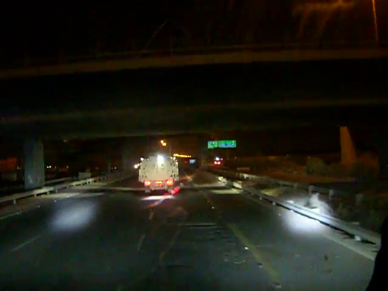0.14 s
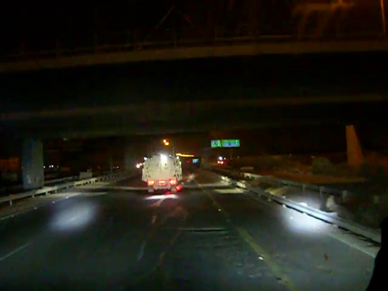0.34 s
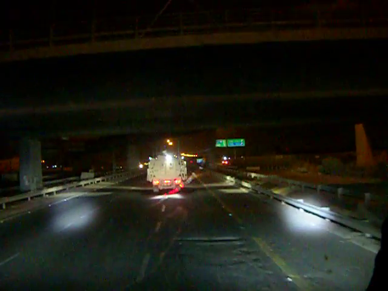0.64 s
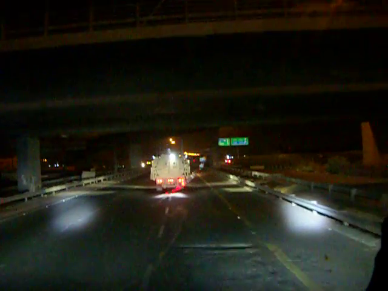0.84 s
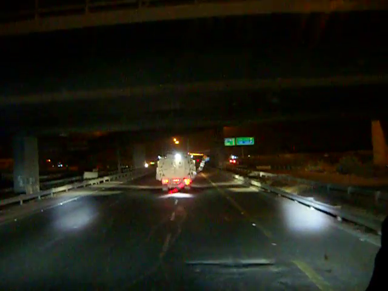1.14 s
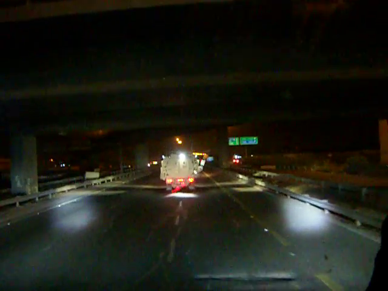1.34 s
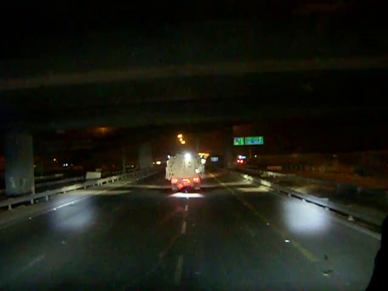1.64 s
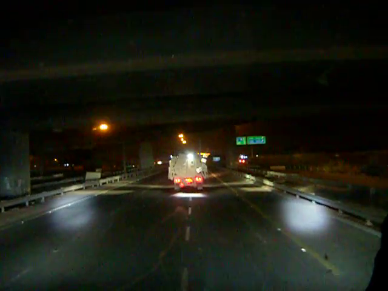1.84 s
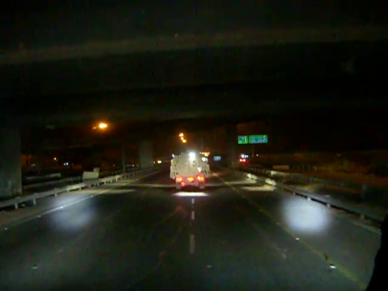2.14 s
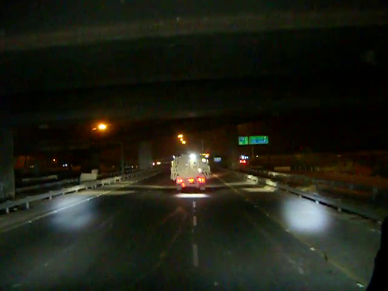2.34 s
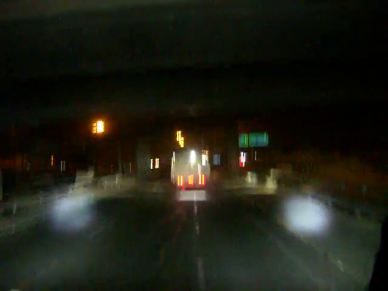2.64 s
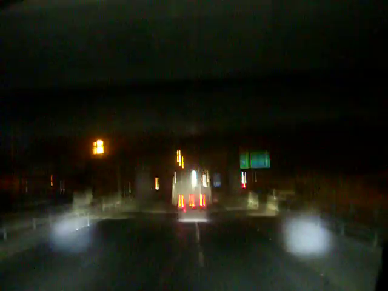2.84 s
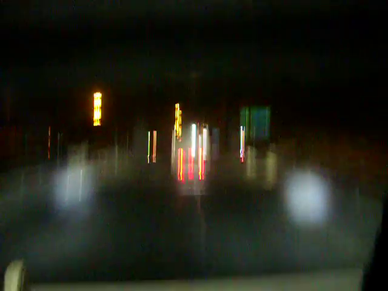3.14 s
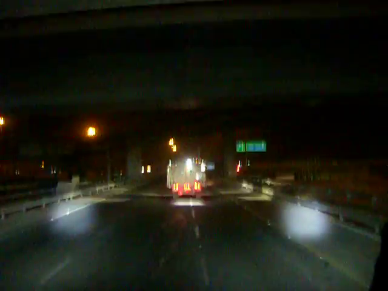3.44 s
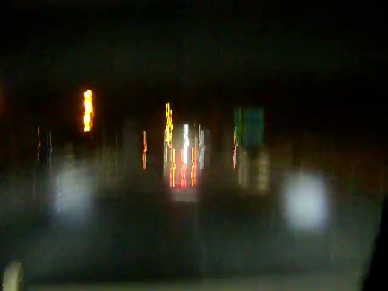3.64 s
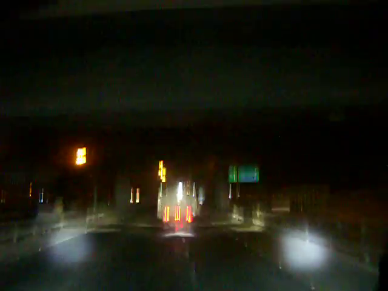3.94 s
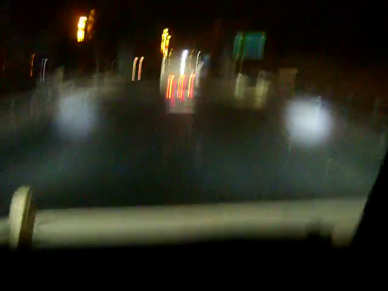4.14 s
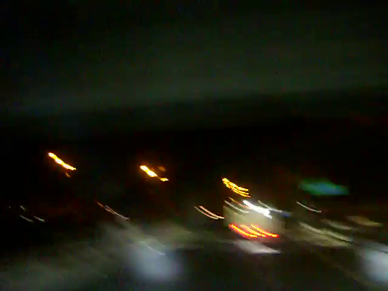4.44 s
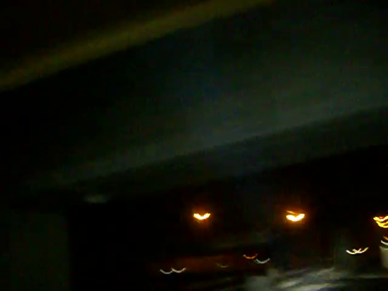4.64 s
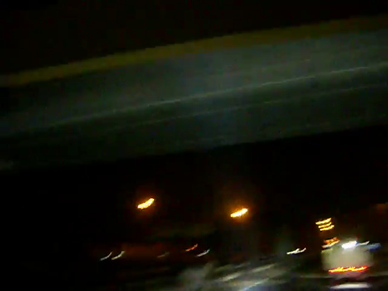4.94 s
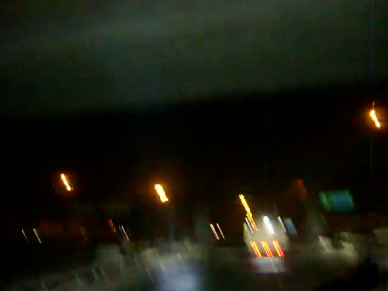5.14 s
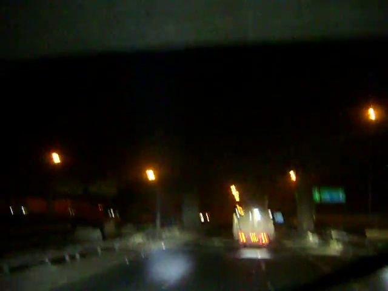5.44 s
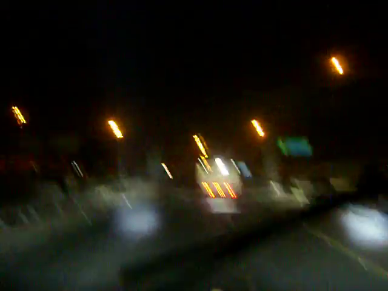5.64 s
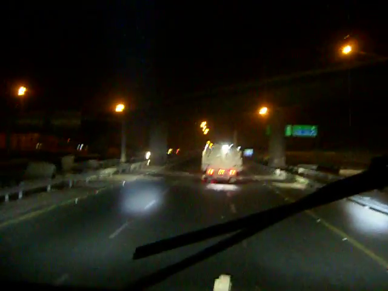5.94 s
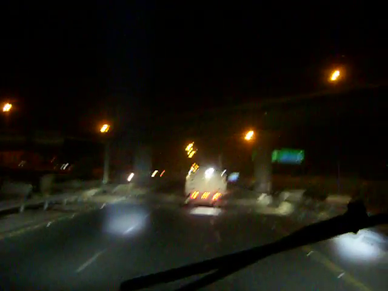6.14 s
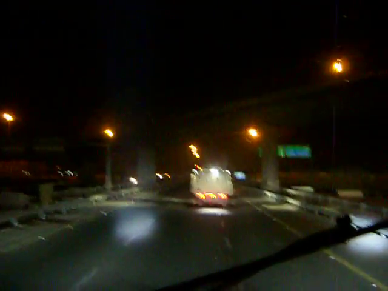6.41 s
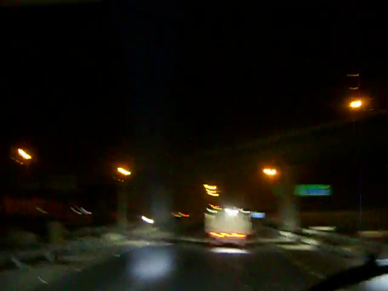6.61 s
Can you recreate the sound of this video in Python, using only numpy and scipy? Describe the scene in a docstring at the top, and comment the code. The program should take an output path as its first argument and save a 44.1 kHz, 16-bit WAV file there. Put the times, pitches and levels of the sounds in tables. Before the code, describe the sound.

Inside a heavy truck cab driving at night, a small hand-held camera hears a continuous low engine drone, wavering sub-bass boom, muffled road roar and light hiss, with faint steady whines. At first the engine pulls; from about 0.5 to 1.3 seconds its pitch drops and it coasts, slightly quieter. Tiny trim squeaks appear around 0.9 to 1.9 and again from 2.4. From about 2.7 to 4.3 seconds the road turns rough: a loose panel bangs in fast, irregular, hollow metallic blows, around sixteen a second, with clattering gear and sharp squeaks, loud enough to clip harshly. A hard tap on the camera comes at 4.3, another at 4.9, a very faint one at 6.1. From about 4.4 the engine picks up slightly, and as the camera turns the tone colour shifts, somewhat duller. Steady booming drone continues to the end, near 6.8 seconds.

```python
"""Inside the cab of a heavy truck, beside a small hand-held camera, the cab booms over the engine and road drone.
The boom is a wavering sine with low noise; engine tones are multiples of one cycle, and the drone is coloured noise.
Over a rough stretch a loose panel bangs irregularly, some sixteen times a second, and overloads the microphone.
Trim squeaks as noise through narrow resonances, loose gear clatters, and taps on the camera body ring briefly.
The engine slows, coasts and picks up again; as the camera turns, other engine tones come forward."""
import sys
import numpy as np
from scipy import signal
from scipy.fft import rfft, irfft, next_fast_len
from scipy.io import wavfile
from scipy.ndimage import uniform_filter1d, map_coordinates

SR = 44100
rng = np.random.default_rng(int(sys.argv[2]) if len(sys.argv) > 2 else 0)


def output_pcm(signal):
    """Save a mono or channel-first signal as 16-bit PCM at the path in sys.argv[1].

    Samples are clipped to [-1, 1] before scaling.
    """
    pcm = np.clip(np.atleast_2d(signal).T, -1, 1) * 32767
    wavfile.write(sys.argv[1], SR, np.round(pcm).astype(np.int16))


N = 298622

# Throb of the cab air and springs. Each row: time in seconds, level in dB.
BOOM_LEVEL = [(0.0, -20), (0.11, -18), (0.47, -8.5), (0.68, -10.5), (0.94, -20.5), (1.26, -14.5),
              (1.9, -18.5), (2.11, -25.5), (2.37, -15), (2.85, -22), (3.41, -14), (3.64, -24), (3.75, -11),
              (4.22, -16), (4.54, -9), (4.66, -23), (4.71, -15.5), (5.02, -11), (5.6, -18.5), (5.81, -10.5),
              (6.19, -12), (6.47, -21), (6.66, -12.5), (6.77, -12)]
# Rocking on the mounts. Each row: frequency in Hz, relative density in dB.
SWAY_SPECTRUM = [(4, -31.5), (9, -8.5), (14, -3.5), (18, -3), (20.5, -5.5), (24, -37.5), (30, -140)]
# Engine cycle rate. Each row: time in seconds, cycles per second in Hz.
ENGINE_SPEED = [(0, 24.1), (.45, 24), (.94, 20.5), (1.3, 19.2), (4.35, 19.4), (4.8, 20.75), (5.5, 20.9),
                (6.77, 20.85)]
# Multiples of the engine cycle that stand out. Each entry: a whole number.
MULTIPLES = [3, 4, 5, 6, 7, 8, 9, 12, 15, 16, 23, 25, 26, 32, 34, 35, 37, 40, 49, 52]
# Their levels under load, coasting, and with the camera turned, before the cab mode's lift. Each entry: level in dB.
PULLING_DB = [-36, -31, -28, -32, -33.5, -33, -33, -35.5, -30.5, -29.5, -34.5, -47.5, -37.5, -46, -31, -40,
              -48, -36, -56, -47.5]
COASTING_DB = [-31.5, -30, -37.5, -28.5, -36.5, -36, -39, -47, -46.5, -46.5, -44, -48, -42, -42, -37.5,
               -49.5, -40, -50.5, -54, -56.5]
TURNED_DB = [-33.5, -32, -37.5, -30, -38.5, -43.5, -38.5, -44.5, -43.5, -34, -52, -41.5, -35, -42.5, -41,
             -39.5, -36, -39, -42, -42]
# Whines independent of the engine. Each row: start and end in seconds, frequency in Hz, start and end level in dB.
WHINES = [(-.2, 2.4, 549, -36, -34.5), (-.2, 2, 645, -38, -31.5), (-.2, 4.4, 1400, -43, -41),
          (4.1, 5.15, 1225, -43, -41.5), (4.9, 6.4, 1626, -47, -48.5), (5.1, 7, 608, -28, -26.5),
          (6.55, 7, 1400, -43, -44.5)]
# Panel bangs. Each row: start in seconds, level in dB before a common 2 dB cut, length of the ring in seconds,
# ring relative to chatter in dB.
BANGS = [(2.684, -31.5, 0.013, 20.5), (2.78, -4.5, 0.014, -17.5), (2.826, -1.5, 0.021, -1.5),
         (2.926, -3.5, .02, 6), (3.023, 5.5, 0.031, -6), (3.111, -7.5, .025, 7.5),
         (3.15, -13.5, 0.011, -15), (3.202, 2.5, 0.022, -3.5), (3.271, -9.5, .008, 5),
         (3.282, 0.5, 0.0078, 9.5), (3.343, -5, 0.023, 1.5), (3.421, -15, 0.011, 7), (3.448, -27, .008, 9),
         (3.478, -8.5, 0.0053, 7.5), (3.521, -12.5, 0.013, 4), (3.537, -13, 0.026, 0),
         (3.601, 0.5, .027, -8), (3.686, 3.5, 0.01, 5), (3.746, -13.5, .03, -4.5), (3.795, 2, .032, -9.5),
         (3.866, -1.5, .036, 3.5), (3.953, 2.5, .027, -1), (4.024, -13.5, 0.01, -3.5), (4.041, 2, .031, 0),
         (4.226, -12, 0.011, -5), (4.263, -20.5, 0.0094, 9.5), (4.297, -13.5, 0.027, -14.5)]
# Panel rattling on its frame. Each row: frequency in Hz, relative density in dB.
CHATTER_SPECTRUM = [(60, -42.5), (150, -5.5), (340, 0.5), (550, -3), (690, -6.5), (950, -5.5),
                    (1340, -13.5), (2150, -17), (3000, -18.5), (4200, -26.5), (6000, -120)]
# Upper panel modes. Each row: frequency in Hz, width in Hz, relative level in dB before each blow's scatter.
PANEL_MODES = [(950, 100, 10.5), (1270, 69, -13.5), (1590, 61, -6), (1970, 43, -8.5), (2150, 120, -10.5),
               (2800, 120, -19), (3330, 220, -18.5)]
# Strength of the rough stretch. Each row: time in seconds, level in dB before each source's own offset.
SHAKE_LEVEL = [(2.3, -29.5), (2.66, -18.5), (2.93, -11.5), (3.14, -10), (3.26, -20.5), (3.4, -17.5),
               (3.71, -13), (3.9, -11), (4.24, -23.5), (4.6, -28)]
# Rubbing trim. Each row: start in seconds, level in dB, frequency in Hz, length in seconds.
SQUEAKS = [(0.861, -26.5, 2250, 0.013), (1.006, -25.5, 2210, 0.032), (1.407, -34, 2300, 0.018),
           (1.53, -31, 2310, 0.015), (1.756, -25, 2170, 0.038), (1.874, -32, 1630, 0.035),
           (2.445, -28.5, 1570, 0.027), (2.578, -21, 1740, 0.027), (2.718, -27, 2300, 0.036),
           (2.799, -14.5, 1885, 0.0065), (3.014, -6, 2215, 0.011), (3.045, -18, 2095, 0.019),
           (3.145, -18, 1973, 0.034), (2.365, -21.5, 722, 0.039), (4.456, -29.5, 1630, 0.019),
           (4.551, -31, 2100, 0.021)]
# Taps on the camera body. Each row: start in seconds, level in dB.
TAPS = [(4.3183, 5.5), (4.885, 1), (6.118, -22)]
# Noise spectra: low rumble, roar with the camera facing ahead and turned, and hiss.
# Each row: frequency in Hz, relative density in dB.
RUMBLE_SPECTRUM = [(30, -42.5), (40, -9), (52, -5.5), (65, -3), (86, -3), (100, -6.5), (125, -4.5),
                   (160, -9.5), (210, -18.5), (290, -45.5), (500, -120)]
ROAR_AHEAD_SPECTRUM = [(100, -25), (170, -1), (322, -4.5), (366, -1.5), (405, -4.5), (555, 1), (594, -2.5),
                       (636, 0.5), (748, -4.5), (821, -1), (1030, -17.5), (1300, -17), (1690, -49.5),
                       (2860, -120)]
ROAR_TURNED_SPECTRUM = [(100, -26), (170, -12.5), (265, -6.5), (330, -6), (378, -7), (476, -9), (609, 0.5),
                        (675, -8), (754, -3), (894, -8), (1070, -12.5), (1300, -25), (1690, -64),
                        (2860, -120)]
HISS_SPECTRUM = [(590, -24.5), (1000, 2), (1150, -8), (1260, -3), (1330, -13), (1440, -7), (1470, -8.5),
                 (1790, -9.5), (2190, -6), (2600, -6), (2850, -7), (3620, -14.5), (4120, -18), (5360, -47),
                 (9060, -120)]

BOOM_HZ = 26.32
CAB_HZ, CAB_WIDTH_HZ, CAB_DB = 75.2, 5.4, 3.5  # cab mode, and its peak gain added to the direct tone
RING_HZ, RING_SCATTER = 562, 0.035  # main panel mode; share by which it shifts from blow to blow
TURN_FROM_S, TURN_TO_S = 4.4, 5.47  # the camera swings to a new aim
# On smooth road: (facing ahead, turned), in dB; the load raises roar and hiss further.
SWAY_DB, RUMBLE_DB, ROAR_DB, HISS_DB = (-21.5, -26.5), (-25, -27), (-21.5, -24.5), (-31, -32.5)
# Offsets from the shaking, in dB.
SHAKEN_SWAY_DB, SHAKEN_RUMBLE_DB, SHAKEN_ROAR_DB, CLATTER_DB = 1, -3, -4, -4.5
LOAD_DB = 2  # extra roar and hiss while the engine pulls
TONE_EASE_S, NOISE_EASE_S = (0.48, 1.152), (0.48, 1.344)  # when the pull eases off: (from, to)
CLIP_LEVEL, SECOND_CLIP_LEVEL = 0.692, 0.701  # of full scale
BAND_HZ, TOP_HZ = 3942, 15850  # the camera's narrow sound band; upper limit of what is left


def amp(db):
    """A level in dB is the logarithm of an amplitude ratio; this gives the ratio."""
    return 10 ** (np.asarray(db) / 20)


def unit(x):
    """Dividing by the root mean square scales a signal to rms 1."""
    return x / np.sqrt(np.mean(x ** 2) + 1e-20)


def curves(rows):
    """Linear interpolation in time gives one value per sample for each column after the time."""
    s, *columns = np.transpose(rows)
    return [np.interp(np.arange(N) / SR, s, column) for column in columns]


def ramp(from_s, to_s):
    """A linear transition rises from 0 to 1 between two times."""
    return np.clip((np.arange(N) / SR - from_s) / (to_s - from_s), 0, 1)


def wobble(rate):
    """A spline through random knots, rate of them a second, is a slow random fluctuation."""
    knots = rng.standard_normal(int(N * rate / SR) + 4)
    coarse = np.arange(0, N + 32, 32)
    return np.interp(np.arange(N), coarse, map_coordinates(knots, [coarse * rate / SR]))


def filtered(x, response):
    """Linear filtering multiplies the spectrum by a complex response of frequency."""
    m = next_fast_len(len(x) + 8192)
    spectrum = rfft(x, m) * response(np.fft.rfftfreq(m, 1 / SR))
    return irfft(spectrum, m)[:len(x)]


def colour(points):
    """A spectral envelope gives gain from (Hz, dB) points joined on a logarithmic axis."""
    f, db = np.transpose(points)
    return lambda hz: amp(np.interp(np.log(hz + 1), np.log(f + 1), db))


def resonance(centre_hz, width_hz):
    """A damped mode responds with unit gain at its centre and over a band set by its damping."""
    return lambda f: 1j * f * width_hz / (centre_hz ** 2 - f * f + 1j * f * width_hz)


def rush(spectrum, patchy_db):
    """Broadband noise of rms 1, uneven in time and frequency through patches of random gain."""
    z = signal.stft(rng.standard_normal(N), nperseg=1024)[2]
    field = uniform_filter1d(rng.standard_normal(z.shape), size=5, axis=0)
    field = uniform_filter1d(field, size=6, axis=1)
    noise = signal.istft(z * amp(patchy_db * unit(field)), nperseg=1024)[1][:N]
    return unit(filtered(noise, colour(spectrum)))


def tone(hz, drift_hz, drift_rate, waver_db):
    """Phase is the integral of frequency: a drifting, wavering sine of rms near 1."""
    phase = 2 * np.pi * (np.cumsum(hz + drift_hz * wobble(drift_rate)) / SR + rng.random())
    return np.sqrt(2) * amp(waver_db * wobble(7)) * np.sin(phase)


def burst(length, attack, release):
    """An exponential rise, then exponential decay from length seconds on, shape a brief excitation."""
    t = np.arange(SR // 8) / SR
    return (1 - np.exp(-t / attack)) * np.exp(-np.maximum(t - length, 0) / release)


def add(track, s, sound):
    """By superposition, a sound joins the track at s seconds."""
    part = track[round(s * SR):][:len(sound)]
    part += sound[:len(part)]


def aimed(ahead_db, turned_db):
    """Power passes linearly from one level to the other as the camera turns."""
    turn = ramp(TURN_FROM_S, TURN_TO_S)
    return np.sqrt((1 - turn) * amp(2 * ahead_db) + turn * amp(2 * turned_db))


def shaking():
    """The rough road drives the cab with a varying gain, nil on smooth road."""
    t = np.arange(N) / SR
    rough = (t > SHAKE_LEVEL[0][0]) & (t < SHAKE_LEVEL[-1][0])
    return rough * amp(curves(SHAKE_LEVEL)[0])


def boom():
    """A low cab mode throbs as a nearly pure tone, while the cab rocks on its mounts as low noise."""
    sway = unit(filtered(rng.standard_normal(N), colour(SWAY_SPECTRUM)))
    sway_gain = np.hypot(aimed(*SWAY_DB), amp(SHAKEN_SWAY_DB) * shaking())
    throb_gain = amp(curves(BOOM_LEVEL)[0] + 1.3 * wobble(5))
    throb = throb_gain * tone(BOOM_HZ, drift_hz=0.794, drift_rate=7, waver_db=1.24)
    return throb + sway_gain * sway


def engine_tones():
    """A periodic source sounds at multiples of its cycle; load and aim set levels, and a cab mode adds lift."""
    speed = curves(ENGINE_SPEED)[0]
    cycle = 2 * np.pi * np.cumsum(speed + 0.0502 * wobble(5)) / SR
    eased, turn = ramp(*TONE_EASE_S), ramp(TURN_FROM_S, TURN_TO_S)
    out = np.zeros(N)
    for k, pulling_db, coasting_db, turned_db in zip(MULTIPLES, PULLING_DB, COASTING_DB, TURNED_DB):
        lift = 1 + amp(CAB_DB) * abs(resonance(CAB_HZ, CAB_WIDTH_HZ)(k * speed))
        level_db = (1 - eased) * pulling_db + (eased - turn) * coasting_db + turn * turned_db
        level_db = level_db + 1.8 * wobble(6)
        out += np.sqrt(2) * lift * amp(level_db) * np.sin(k * cycle + 2 * np.pi * rng.random())
    return out


def bangs():
    """Impacts make the panel chatter against its frame; its main mode rings while the contact lasts."""
    out = np.zeros(N)
    for s, db, length, ring_db in BANGS:
        rattle_noise, ring_noise, contact_noise, mode_noise = rng.standard_normal((4, SR // 8))
        # the contact is uneven, a few ms at a time
        contacts = amp(6.5 * unit(uniform_filter1d(contact_noise, size=150)))
        # every blow lands elsewhere and wakes other modes
        strengths = amp(5.5 * rng.standard_normal(len(PANEL_MODES)))

        def modes(f):
            """Modes superpose, each weighted by its share of the blow."""
            return sum(strength * amp(level) * resonance(hz, width)(f)
                       for strength, (hz, width, level) in zip(strengths, PANEL_MODES))

        chatter = unit(contacts * filtered(rattle_noise, colour(CHATTER_SPECTRUM)))
        chatter = chatter + amp(-4) * unit(filtered(mode_noise, modes))
        chatter = chatter * burst(0.52 * length, attack=0.00013, release=0.0065)
        crack = unit(filtered(contact_noise, resonance(2000, 1200)))
        crack = crack * burst(0.0015, attack=0.00036, release=0.0015)
        ring_hz = RING_HZ * (1 + RING_SCATTER * rng.standard_normal())
        ring = unit(filtered(ring_noise, resonance(ring_hz, 70)))
        ring = ring * burst(length, attack=0.0039, release=0.0033)
        add(out, s, amp(db - 2.0) * (chatter + amp(-8) * crack + amp(ring_db) * ring))
    return out


def clatter():
    """Random impacts of loose gear are noise with a lumpy envelope, driven by the shaking."""
    lumps = amp(3.2 * wobble(70) + 4.4 * wobble(400))
    return amp(CLATTER_DB) * shaking() * unit(lumps * rush(CHATTER_SPECTRUM, patchy_db=2.0))


def squeaks():
    """Stick-slip friction of the trim excites a narrow resonance; squaring it adds a weak octave."""
    out = np.zeros(N)
    for s, db, hz, length in SQUEAKS:
        slips = filtered(rng.standard_normal(SR // 8), resonance(hz, 240))
        rub = unit(filtered(slips, resonance(hz, 260)))
        rub = rub + 0.06 * filtered(rub ** 2, resonance(2 * hz, 900))
        add(out, s, amp(db) * rub * burst(length, attack=0.004, release=0.006))
    return out


def taps():
    """An impulse on the small plastic body is a half-sine push followed by a few decaying cycles."""
    out, t = np.zeros(N), np.arange(SR // 50) / SR
    push_s = 0.00022
    push = np.sin(np.pi * np.minimum(t / push_s, 1))
    ring = np.sin(2 * np.pi * 2700 * (t - push_s)) * np.exp(-t / 0.0008) * (t > push_s)
    body = 1.1 * push - 0.7 * ring
    for s, db in TAPS:
        add(out, s, amp(db) * body)
    return out


def whines():
    """Tones independent of the engine cycle keep a nearly steady pitch and fade in and out."""
    out, t = np.zeros(N), np.arange(N) / SR
    for start, end, hz, start_db, end_db in WHINES:
        fade = np.clip(np.minimum(t - start, end - t) / 0.21, 0, 1)
        level = amp(np.interp(t, [start, end], [start_db, end_db]))
        out += level * fade * tone(hz, drift_hz=1.3, drift_rate=6, waver_db=1.0)
    return out


def drone():
    """Panels and glass transmit tyres, engine block and wind as shaped noise; shaking adds rumble and roar."""
    turn = ramp(TURN_FROM_S, TURN_TO_S)
    load = amp(LOAD_DB * (1 - ramp(*NOISE_EASE_S)))
    flutter = wobble(12)  # shared by roar and hiss: road texture shakes the panels together
    rumble_gain = np.hypot(aimed(*RUMBLE_DB), amp(SHAKEN_RUMBLE_DB) * shaking())
    rumble = rumble_gain * amp(0.52 * wobble(8.7)) * rush(RUMBLE_SPECTRUM, patchy_db=-1.1)
    roar = np.sqrt(1 - turn) * rush(ROAR_AHEAD_SPECTRUM, patchy_db=1.7)
    roar = roar + np.sqrt(turn) * rush(ROAR_TURNED_SPECTRUM, patchy_db=0.04)
    roar_gain = np.hypot(load * aimed(*ROAR_DB), amp(SHAKEN_ROAR_DB) * shaking())
    roar = roar_gain * amp(0.52 * flutter) * roar
    hiss = load * aimed(*HISS_DB) * amp(0.47 * flutter) * rush(HISS_SPECTRUM, patchy_db=1.48)
    return rumble + roar + hiss


def scene():
    """Sound pressures superpose at one microphone."""
    sources = boom() + engine_tones() + bangs() + clatter() + squeaks() + taps() + whines() + drone()
    return sources[None]


def record(dry):
    """Overload flattens the peaks, band limiting makes them overshoot, and the overshoot is clipped again."""
    x = np.clip(dry[0], -CLIP_LEVEL, CLIP_LEVEL)
    x = filtered(x, lambda hz: 1 / (1 + (hz / BAND_HZ) ** 26))
    x = np.clip(x, -SECOND_CLIP_LEVEL, SECOND_CLIP_LEVEL)
    x = filtered(x, colour([(8000, 0), (9500, -1), (16000, 1.5)]))  # slight treble dip, then a rise
    return filtered(x, lambda hz: hz < TOP_HZ)[None]


dry = scene()
out = record(dry)
output_pcm(out)
```